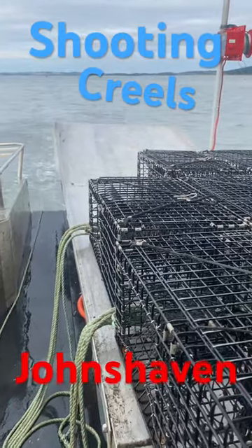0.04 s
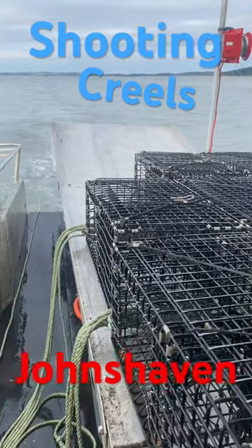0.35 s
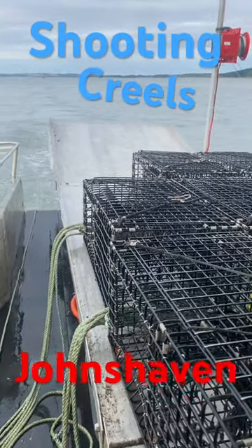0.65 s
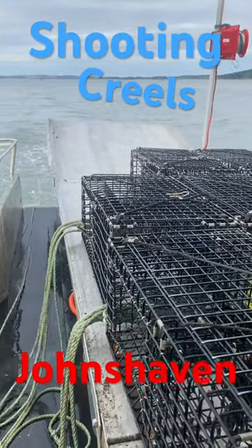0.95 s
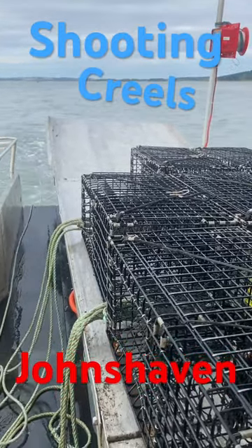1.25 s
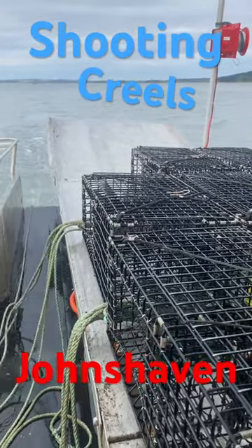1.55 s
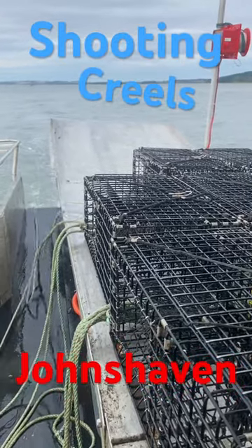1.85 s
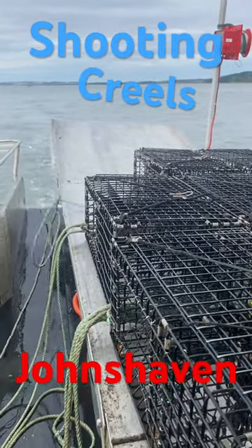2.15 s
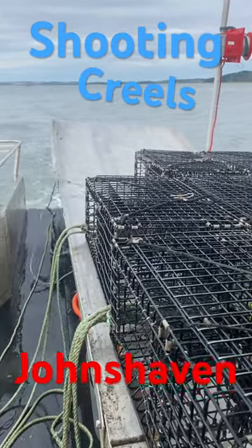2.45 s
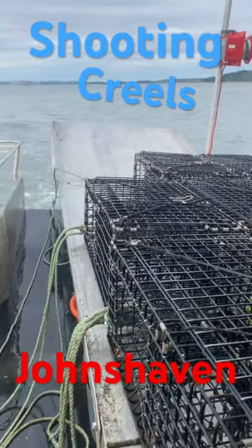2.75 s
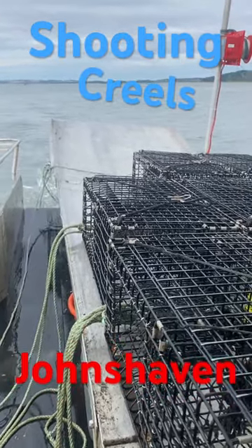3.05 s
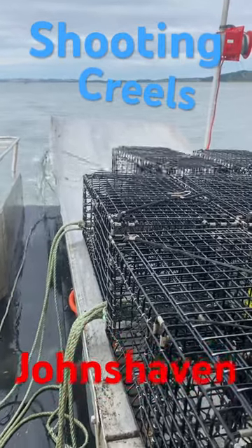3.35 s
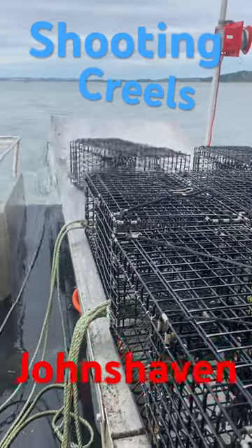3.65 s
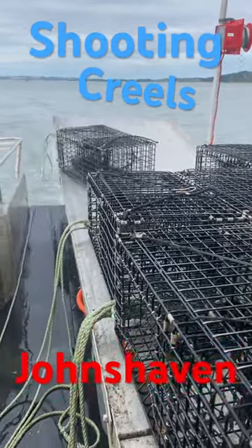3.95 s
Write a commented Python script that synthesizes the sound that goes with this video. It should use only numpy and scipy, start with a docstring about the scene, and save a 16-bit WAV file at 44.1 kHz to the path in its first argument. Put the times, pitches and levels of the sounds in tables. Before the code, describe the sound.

A diesel engine throbs throughout on a small boat, with water churning astern and a wave slopping at about 1 second. From 2 to 3 seconds rope runs out in hissing pulls and slaps the deck. Wind buffets the microphone from 2.5 seconds. Just after 3 seconds a wire trap scrapes and rattles with dull thuds, then crashes onto a ringing metal ramp at around 3.8 seconds.

```python
"""A diesel throbs under the wash of the wake, on the deck of a small fishing boat shooting creels.
Rope runs out in hissing stick-slip pulls, flicks over edges and slaps the deck, then drags a wire creel
off the stack. The creel scrapes along, mesh rattling, and crashes onto the ringing metal stern ramp.
A gust buffets the two close microphone ports."""
import sys
import numpy as np
from scipy import signal
from scipy.fft import rfft, irfft, next_fast_len
from scipy.io import wavfile
from scipy.ndimage import map_coordinates

SR = 44100
rng = np.random.default_rng(int(sys.argv[2]) if len(sys.argv) > 2 else 0)


def inscribe(sig):
    """Save sig as 16-bit PCM at rate SR to the path in sys.argv[1].

    A 1-D sig is mono; a 2-D sig holds one channel per row.
    Samples are clipped to [-1, 1] before scaling.
    """
    pcm = np.round(np.clip(np.atleast_2d(sig).T, -1, 1) * 32767)
    wavfile.write(sys.argv[1], SR, pcm.astype(np.int16))


N = 4 * SR
TAIL = SR // 4  # samples per impact


# scrape and wire-rattle envelopes: t/s, level/dB
DRAG_LEVEL = [(3.08, -70.5), (3.14, -35.5), (3.18, -26.5), (3.235, -35), (3.32, -29), (3.47, -27.5),
              (3.57, -25), (3.69, -33), (3.735, -21.5), (3.775, -31), (3.83, -17.5), (3.9, -22), (4, -27)]
RATTLE_LEVEL = [(3.1, -68), (3.17, -31), (3.26, -51), (3.5, -38.5), (3.7, -45.5), (3.775, -41.5),
                (3.795, -22.5), (3.87, -25.5), (4, -33.5)]
# mesh scrape: f/Hz, level/dB
MESH_SPECTRUM = [(150, 15.5), (400, 6.5), (800, 3.5), (1000, -12), (1300, -2), (1900, -3.5), (2400, -5),
                 (3400, 0), (4500, -12), (6000, -10.5), (8000, -18.5), (12000, -45), (15500, -38)]
# frame catching on the stack: t/s, level/dB
CLINKS = [(3.161, -35), (3.171, -35.5), (3.312, -44.5), (3.567, -45.5), (3.728, -42)]
# frame resonances: f/Hz, level/dB, t60/s
FRAME_MODES = [(1275, 1.5, .3), (2047, -5, 0.44), (2680, -1, .18), (3420, -11.5, .15), (4160, -10, .15)]

def creel_drag():
    """The creel scrapes off the stack; its wires rattle and its frame rings where it catches."""
    scrape = friction(MESH_SPECTRUM, rate=1600, spread_db=2.2, judder_db=1.2, judder_hz=110,
                      smear_t60_s=.05, ramp_db=-12)
    wires = pings(rate=550, low_hz=900, high_hz=4100, t60_s=.06, spread_db=10)
    out = scrape * undb(curve(DRAG_LEVEL)) + wires * undb(curve(RATTLE_LEVEL))
    for start_s, db in CLINKS:
        frame = ring(FRAME_MODES)
        scuff = burst(MESH_SPECTRUM, t60_s=.079, rate=1600, tilt_db_oct=2)
        add(out, start_s, db, frame + undb(-4.5) * scuff)
    return out


# blows on the ramp: t/s, level/dB, tilt/(dB/oct), panel f/Hz
BLOWS = [(3.786, -20, 2, 1165), (3.800, -19.5, -1, 567), (3.820, -16.5, -2, 792), (3.838, -14.5, -3.5, 385),
         (3.853, -18, -0.5, 666), (3.878, -17.5, -4, 495), (3.905, -19.5, -4, 649), (3.943, -16, -4, 319.3),
         (3.973, -18.5, -7, 417)]
# thuds of the creel's weight: t/s, level/dB, boom f/Hz, boom t60/s
THUDS = [(3.262, -24, 151.5, 0.21), (3.355, -13, 135.7, .16), (3.366, -21.5, 292, 0.31),
         (3.564, -24, 412.6, 0.75), (3.725, -16, 146, 0.18), (3.781, -12.5, 79.3, .15),
         (3.799, -8, 173, 0.26), (3.895, -10.5, 116, 0.16), (3.934, -11.5, 78.5, 0.3)]
# contact noise of each: f/Hz, level/dB
BLOW_SPECTRUM = [(80, -2), (200, -6.5), (400, 0.5), (720, -1.5), (1000, -11), (1250, -5), (1500, -11.5),
                 (1950, -10.5), (3300, -17.5), (6000, -24), (8000, -34), (15500, -61)]
THUD_SPECTRUM = [(25, -45.5), (60, 1.5), (130, -2), (220, -10), (340, -9.5), (500, -27.5), (1500, -64.5),
                 (4000, -88.5)]
# ramp resonances: f/Hz, level/dB, t60/s
RAMP_MODES = [(314.6, -0.5, 0.074), (388.5, -1, 0.14), (499, -8.5, 0.4), (545, -9, 0.34), (659.5, -7, 0.18),
              (750, 1, 0.065), (846, 0, 0.14), (1192, -9.5, 0.19), (1271, -13.5, 0.64), (1745, -6, .12),
              (1910, -10.5, 0.12), (3730, -12.5, 0.15)]

def creel_crash():
    """Each blow rings the ramp and the struck panel; the creel's weight lands in dull booms."""
    out = np.zeros((2, N))
    for start_s, db, tilt_db_oct, panel_hz in BLOWS:
        panel = ring([(panel_hz, 0, .3)])
        clash = burst(BLOW_SPECTRUM, t60_s=.44, rate=2000, tilt_db_oct=tilt_db_oct)
        add(out, start_s, db, clash + undb(-9.5) * ring(RAMP_MODES) + undb(-5) * panel)
    for start_s, db, boom_hz, t60_s in THUDS:
        thud = burst(THUD_SPECTRUM, t60_s=.14, rate=4000)
        boom = ring([(boom_hz, 0, t60_s)])
        add(out, start_s, db, thud + undb(-4) * boom)
    return out


# pulls: t/s, level/dB
ROPE_LEVEL = [(1.98, -55.5), (2.05, -42.5), (2.085, -42), (2.105, -37), (2.14, -36.5), (2.19, -39),
              (2.275, -43.5), (2.32, -68), (2.41, -42.5), (2.47, -35.5), (2.54, -56), (2.66, -43),
              (2.78, -38), (2.86, -44), (2.95, -70)]
# hiss: f/Hz, level/dB
ROPE_SPECTRUM = [(400, -18), (560, 3), (800, 14), (1050, 6.5), (1900, 3), (2500, 5), (3600, 5), (4500, -3),
                 (6500, 0), (8000, -9.5), (12000, -25.5), (15500, -33)]
# flicks over an edge: t/s, level/dB, resonance f/Hz
FLICKS = [(1.431, -48, 2300), (2.040, -48.5, 3480), (2.099, -39.5, 5930), (2.713, -50.5, 4250),
          (2.802, -52, 5000)]

def rope_run():
    """Rope rubs over the deck in uneven pulls and flicks over edges."""
    hiss = friction(ROPE_SPECTRUM, rate=1500, spread_db=5, judder_db=2.2, judder_hz=70,
                    smear_t60_s=.035, ramp_db=-6)
    out = hiss * undb(curve(ROPE_LEVEL))
    for start_s, db, hz in FLICKS:
        add(out, start_s, db, rope_flick(hz))
    return out


# rope tick: f/Hz, level/dB
FLICK_SPECTRUM = [(400, -21), (3500, 9.5), (6500, 1.5), (13000, -20.5)]

def rope_flick(hz):
    """A bright tick of rope with one resonance."""
    tick = burst(FLICK_SPECTRUM, t60_s=.11, rate=4000)
    resonance = signal.lfilter(*signal.iirpeak(hz, Q=8, fs=SR), tick)
    return tick + undb(16.5) * resonance


# slaps: t/s, level/dB, tilt/(dB/oct), low mode f/Hz, upper mode f/Hz, bite f/Hz
SLAPS = [(1.956, -24, -2.5, 768, 1916, 3620), (2.094, -23.5, -11.5, 436, 787, 2410),
         (2.638, -21.5, -0.5, 835.6, 1730, 3620), (2.65, -31.5, -6.5, 827, 2020, 3040),
         (2.971, -20.5, -2, 758, 1542, 2940), (2.985, -24, -8.5, 748, 1086, 2550)]
# smack: f/Hz, level/dB
SLAP_SPECTRUM = [(120, -18.5), (420, -4), (830, 4.5), (1100, -1.5), (1780, -0.5), (3600, -4), (5000, -22),
                 (7000, -37), (15000, -48)]

def rope_slaps():
    """Rope smacks the deck, ringing the ramp and two modes of the struck spot."""
    out = np.zeros((2, N))
    for start_s, db, tilt_db_oct, low_hz, upper_hz, bite_hz in SLAPS:
        smack = burst(SLAP_SPECTRUM, t60_s=.18, rate=5000, tilt_db_oct=tilt_db_oct)
        spot = undb(-5) * ring([(low_hz, 0, .17), (upper_hz, -4, .16)])
        bite = undb(-22.5) * rope_flick(bite_hz)
        ramp = undb(-7) * ring(RAMP_MODES)
        add(out, start_s, db, smack + spot + bite + ramp)
    return out


# engine speed: t/s, f/Hz
ENGINE_SPEED = [(0, 48.13), (.7, 48.26), (1.2, 48.43), (1.8, 48.97), (2.4, 48.76), (3.0, 48.4), (4, 47.97)]
# order 2 (main note), order 3, order 7 (panel drone): t/s, level/dB
THROB_LEVEL = [(0.0, -23), (0.26, -25.5), (0.31, -34), (0.59, -25), (0.65, -42), (0.73, -23.5), (0.8, -61),
               (0.9, -25), (1.03, -35.5), (1.11, -20.5), (1.19, -31), (1.73, -21), (1.95, -27.5),
               (2.87, -27.5), (2.9, -18.5), (3.08, -27.5), (3.24, -24.5), (3.29, -42), (3.54, -19.5),
               (3.59, -29), (3.7, -24.5)]
THIRD_LEVEL = [(.7, -41), (1.3, -34), (1.65, -42), (1.85, -34), (2.0, -40), (2.3, -27.5), (2.5, -47.5),
               (3.2, -41)]
DRONE_LEVEL = [(0, -47.5), (.65, -43.5), (.98, -34), (1.15, -43.5), (1.35, -40), (1.85, -45), (2.6, -58.5),
               (3.2, -39)]
# other notes: multiple of speed, level/dB
MINOR_ORDERS = [(1, -32.5), (1.5, -50.5), (2.5, -48), (4, -54), (6, -49.5), (8, -52)]
# hull rumble: f/Hz, level/dB
HULL_SPECTRUM = [(20, -52.5), (45, -11.5), (75, 5.5), (105, 5.5), (140, -8), (190, -6), (280, -14),
                 (315, -8.5), (347, -4), (400, -12.5), (480, -20), (900, -41.5)]

def engine():
    """Wavering diesel notes and a droning panel over a hull rumble that pulses with the firings."""
    turn = 2 * np.pi * np.cumsum(curve(ENGINE_SPEED)) / SR
    notes = undb(curve(THROB_LEVEL) - 1) * np.sin(2 * turn + .89 * walk(11)) * undb(.8 * walk(20))
    notes += undb(curve(THIRD_LEVEL) + 1.8 * walk(18)) * np.sin(3 * turn + .23 * walk(7.2))
    notes += undb(curve(DRONE_LEVEL) + 3.05 * walk(22)) * np.sin(7 * turn + walk(24))
    for order, db in MINOR_ORDERS:
        notes += undb(db + 1.6 * walk(8)) * np.sin(order * turn + .14 * order * walk(10))
    firing = 1 + .29 * np.cos(turn)
    rumble = colour(rng.standard_normal((2, N)) * firing, HULL_SPECTRUM)
    shared_only = np.array([[1], [0]])
    return np.sqrt(2) * notes * shared_only + undb(-32) * rumble


# churning water: f/Hz, level/dB
WAKE_SPECTRUM = [(100, -26), (250, 8), (400, 5), (520, 2.5), (800, 2.5), (1050, -2), (1600, -6),
                 (2200, -10), (3000, -11), (4200, -17.5), (6000, -16.5), (8000, -23), (12000, -34.5),
                 (15500, -76)]
# wake and wave envelopes: t/s, level/dB
WAKE_LEVEL = [(0, -40), (.3, -41.5), (.85, -40), (1.0, -38), (1.15, -41.5), (1.9, -38.5), (2.35, -39.5),
              (3, -41.5), (4, -30.5)]
SLOP_LEVEL = [(.85, -82), (.96, -43), (1.05, -39.5), (1.18, -81.5)]

def wake():
    """Water churns astern in a dense fizz; one bubbly wave slops against the hull."""
    fizz = colour(grains(N, rate=9000, spread_db=3.5), WAKE_SPECTRUM)
    fizz *= undb(curve(WAKE_LEVEL) + .5 * walk(20))
    bubbles = pings(rate=480, low_hz=410, high_hz=2240, t60_s=.046, spread_db=10)
    return fizz + bubbles * undb(curve(SLOP_LEVEL))


# gust: t/s, level/dB
GUST_LEVEL = [(2.3, -72), (2.5, -27), (3.0, -24.5), (3.4, -37), (3.7, -28.5), (4, -40)]
# buffeting: f/Hz, level/dB
WIND_SPECTRUM = [(20, -27.5), (60, 3), (120, -3), (250, -17), (500, -29), (1500, -99)]

def wind():
    """Low buffeting, different at each port."""
    return colour(rng.standard_normal((2, N)), WIND_SPECTRUM) * undb(curve(GUST_LEVEL) + 2 * walk(29))


# port pair: f/Hz, coherence (0-1), left lead/rad, left minus right/dB
PORT_RESPONSE = [(100, .998, -.03, .1), (350, .96, -.33, 1), (700, .87, -.57, -2.5),
                 (1200, .74, -.15, -1.5), (1900, .89, .1, -1.3), (2700, .46, .9, -2.2),
                 (3600, .33, 1.2, -1.8), (5000, .62, 1.9, -.7), (8000, .93, 2.8, 0), (8800, .999, 3.13, 0),
                 (11200, .999, 3.15, 0), (12500, .8, 3.5, 0), (14500, .55, 3.8, 0)]

def ports(pair):
    """Spread a shared and a diffuse row over two closely spaced microphone ports."""
    size = N + SR
    hz, side = np.fft.rfftfreq(size, 1 / SR), np.array([[1], [-1]])
    shared, diffuse = rfft(pair, size)
    coherence, lead_rad, balance_db = (across(PORT_RESPONSE, hz, column) for column in (1, 2, 3))
    both = np.sqrt((1 + coherence) / 2) * shared + side * np.sqrt((1 - coherence) / 2) * diffuse
    return irfft(both * np.exp(side * 1j * lead_rad / 2) * undb(side * balance_db / 2))[:, :N]


def friction(spectrum, rate, spread_db, judder_db, judder_hz, smear_t60_s, ramp_db):
    """Stick-slip contacts in uneven spurts, smeared by the deck and ringing the ramp."""
    slips = grains(N, rate, spread_db) * undb(judder_db * walk(judder_hz))
    deck = rng.standard_normal((2, TAIL)) * fade(smear_t60_s)
    smeared = unit(signal.fftconvolve(slips, deck, axes=1)[:, :N])
    ramp = unit(signal.fftconvolve(slips, ring(RAMP_MODES), axes=1)[:, :N])
    return colour(unit(slips + smeared), spectrum) + undb(ramp_db) * ramp


def burst(spectrum, t60_s, rate, tilt_db_oct=0):
    """A blow: a dying burst of contacts and close reflections."""
    return colour(grains(TAIL, rate, spread_db=2.7) * fade(t60_s), spectrum, tilt_db_oct)


def ring(modes):
    """Modes (f/Hz, level/dB, t60/s) struck at a random spot with a brief soft contact."""
    t = np.arange(TAIL) / SR
    rung = np.zeros((2, TAIL))
    for hz, db, t60_s in modes:
        detuned_hz = hz * (1 + .003 * rng.standard_normal())
        rung += undb(db) * fade(t60_s) * np.sin(2 * np.pi * (detuned_hz * t + rng.random((2, 1))))
    contact = 1 - np.exp(-(t / .0008) ** 2)
    power = sum(undb(db) ** 2 for _, db, _ in modes) / 2
    return contact * rung / np.sqrt(power)


def pings(rate, low_hz, high_hz, t60_s, spread_db):
    """Snagging wires or bubbles: `rate` short rings per second, each at its own pitch."""
    out, t = np.zeros((2, N + SR)), np.arange(SR // 25) / SR
    decay = np.exp(-np.log(1000) * t / t60_s)
    for when, pitch, size, spot in rng.random((int(rate * N / SR), 4)):
        hz, at = low_hz * (high_hz / low_hz) ** pitch, int(when * N)
        ping = undb(spread_db * size) * np.sqrt(low_hz / hz) * np.sin(2 * np.pi * hz * t) * decay
        out[:, at:at + len(t)] += np.outer([np.cos(2 * np.pi * spot), np.sin(2 * np.pi * spot)], ping)
    return unit(out[:, :N])


def grains(size, rate, spread_db):
    """Tiny random contacts of uneven strength, about `rate` per second."""
    hit = rng.random((2, size)) < rate / SR
    strength = undb(spread_db * np.clip(rng.standard_normal((2, size)), -2, 2))
    return unit(hit * strength * rng.choice([-1, 1], (2, size)))


def colour(x, spectrum, tilt_db_oct=0):
    """Causal filter of unit power; the spectrum and tilt set only its shape."""
    size = 2 * next_fast_len((x.shape[-1] + TAIL) // 2)
    hz = np.fft.rfftfreq(size, 1 / SR)
    shape_db = across(spectrum, hz) + tilt_db_oct * np.log2(np.clip(hz, 200, 6000))
    cepstrum = irfft(np.log(unit(undb(shape_db))))
    cepstrum[1:size // 2] *= 2  # fold to minimum phase
    cepstrum[size // 2 + 1:] = 0
    return irfft(rfft(x, size) * np.exp(rfft(cepstrum)))[..., :x.shape[-1]]


def walk(knot_hz):
    """Smooth random drift, rms 1."""
    knots = rng.standard_normal(1024)
    return unit(map_coordinates(knots, [np.arange(N) / SR * knot_hz], mode="mirror"))


def fade(t60_s):
    """A quarter second of exponential decay."""
    return np.exp(-np.log(1000) * np.arange(TAIL) / SR / t60_s)


def curve(rows):
    """Join (t/s, value) points by straight lines."""
    return np.interp(np.arange(N) / SR, *np.array(rows, float).T)


def across(rows, hz, column=1):
    """Read a table column on a log-frequency axis."""
    rows = np.array(rows, float)
    return np.interp(np.log(hz + 1), np.log(rows[:, 0]), rows[:, column])


def undb(db):
    """Decibels to gain."""
    return 10 ** (np.asarray(db) / 20)


def unit(x):
    """Scale to rms 1."""
    return x / np.sqrt(np.mean(x ** 2))


def add(out, start_s, db, sound):
    """Mix in one impact."""
    at = int(start_s * SR)
    out[:, at:at + TAIL] += undb(db) * sound[:, :N - at]


def scene():
    """The deck sounds reach the ports as a shared and a diffuse row, with wind on top."""
    deck = engine() + wake() + rope_run() + rope_slaps() + creel_drag() + creel_crash()
    return ports(deck) + wind()


def record(dry):
    """The recorder drops the deepest rumble, rounds the loudest peaks and cuts the top."""
    low_cut = signal.butter(3, 28, "high", fs=SR, output="sos")
    high_cut = signal.ellip(10, .2, 80, 15750, fs=SR, output="sos")
    thinned = signal.sosfilt(low_cut, dry)
    rounded = thinned / (1 + (thinned / .95) ** 4) ** .25
    return signal.sosfilt(high_cut, rounded)


dry = scene()
out = record(dry)
inscribe(out)
```